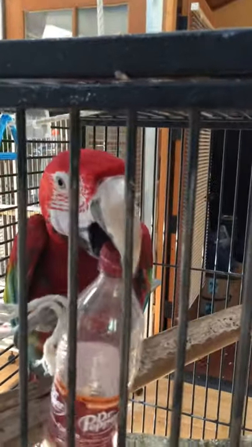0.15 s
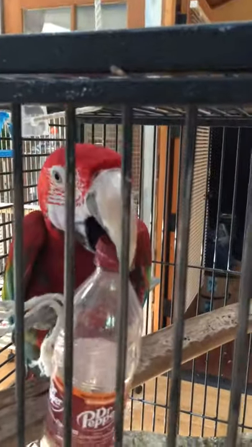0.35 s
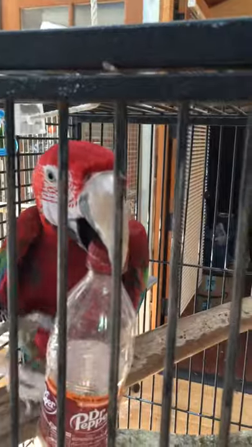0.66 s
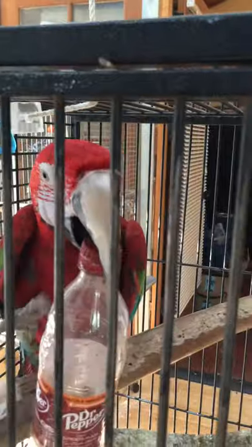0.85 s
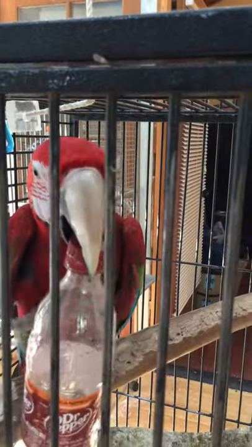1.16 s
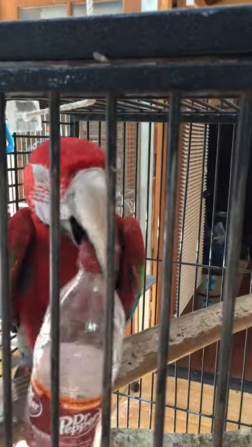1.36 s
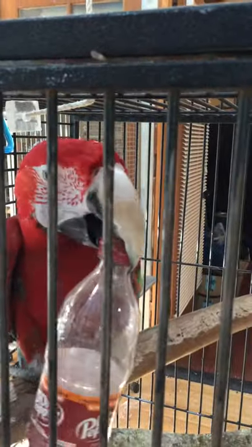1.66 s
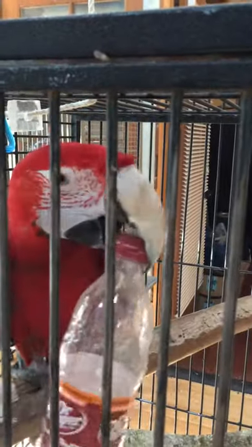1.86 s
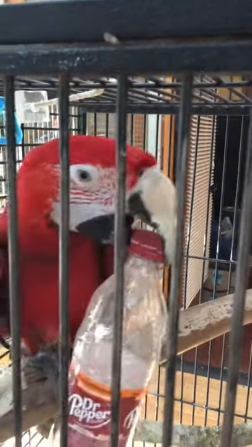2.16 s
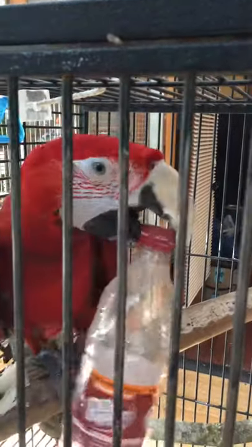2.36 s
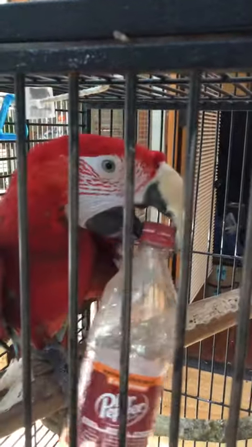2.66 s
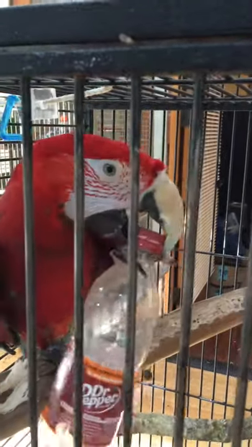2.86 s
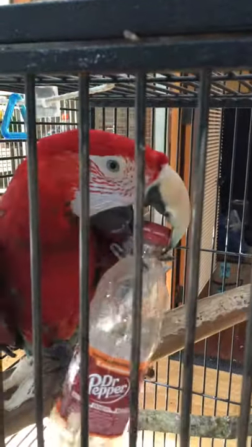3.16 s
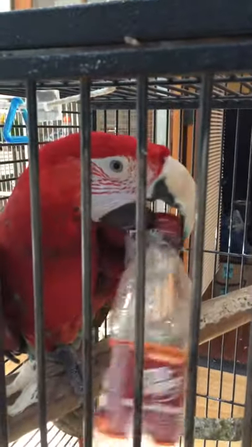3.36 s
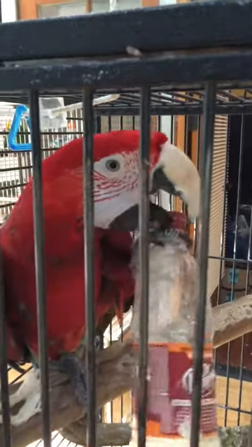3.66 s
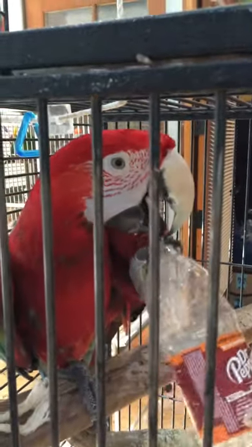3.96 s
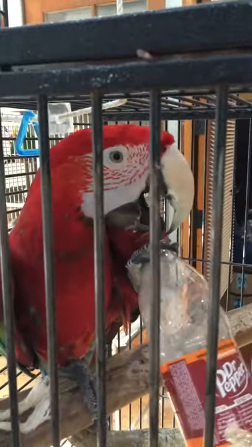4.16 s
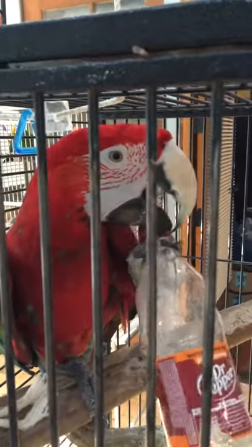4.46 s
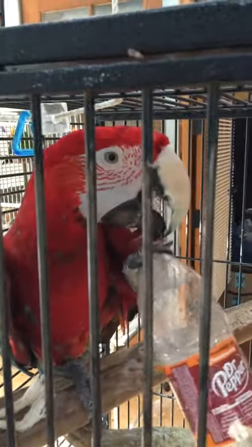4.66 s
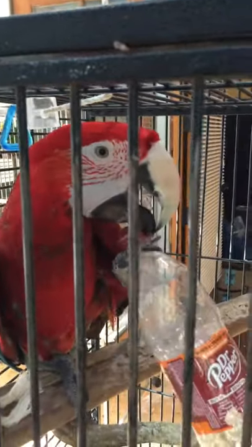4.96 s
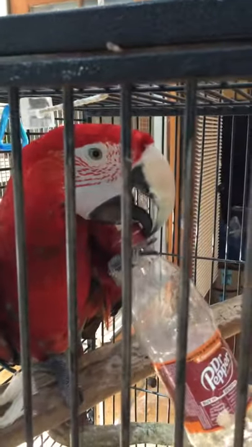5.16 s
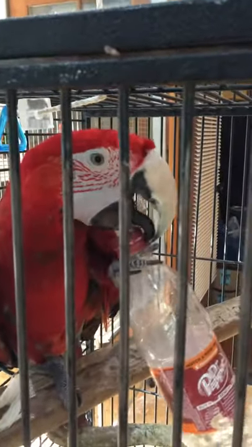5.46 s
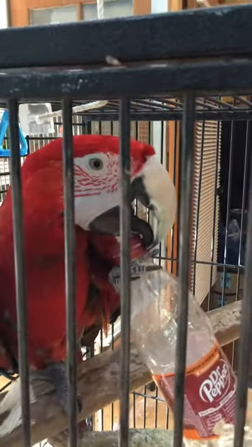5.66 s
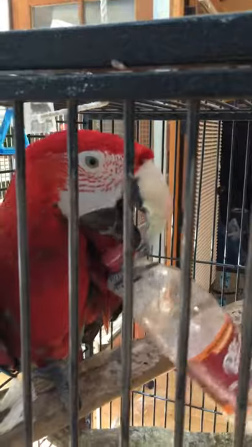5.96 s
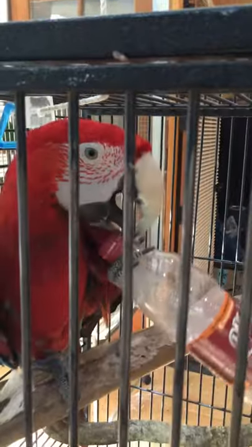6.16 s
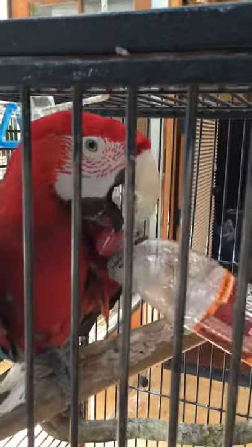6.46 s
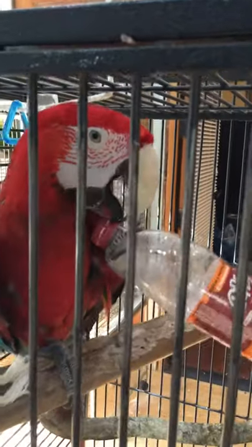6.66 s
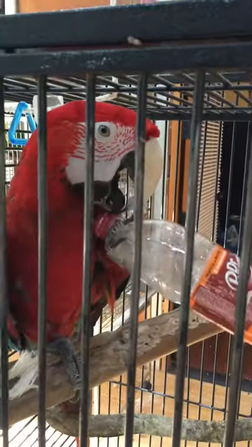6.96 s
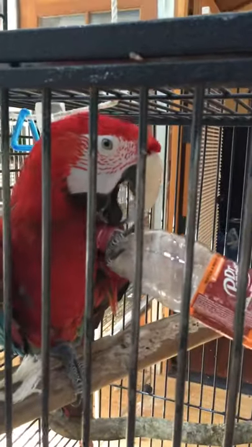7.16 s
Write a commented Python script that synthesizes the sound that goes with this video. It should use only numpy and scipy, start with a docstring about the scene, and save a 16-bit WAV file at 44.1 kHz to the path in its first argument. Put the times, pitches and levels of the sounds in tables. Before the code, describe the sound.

A caged parrot screams near the microphone, four rough, piercing blasts in an even run, each echoing off the room's hard walls. A brief cry leads in, and a squeak and a peep slip between the later screams. Then it goes much quieter: the beak pops, ticks and scrapes on a plastic bottle while the bird shuffles and brushes the wires. A short, raspy squawk comes last.

```python
"""Caged macaw screaming

A macaw screams up close in a hard, echoing room, its syrinx running two rough oscillators at once.
It opens with a cry, squeaks and peeps around the screams, and ends on a rattling squawk. In the lull
its beak pops and scrapes on a plastic bottle, and the cage wires ring faintly as it shuffles."""
import sys
import numpy as np
from scipy import signal
from scipy.fft import rfft, irfft, next_fast_len
from scipy.io import wavfile
from scipy.ndimage import uniform_filter1d, minimum_filter1d

SR = 44100
rng = np.random.default_rng(int(sys.argv[2]) if len(sys.argv) > 2 else 0)


def master_out(mix):
    """Clip the mix to full scale and print it as 16-bit PCM to the path in sys.argv[1]."""
    frames = np.transpose(np.atleast_2d(mix))
    ceiling = np.clip(frames, -1, 1)
    pcm = np.round(ceiling * 32767).astype(np.int16)
    wavfile.write(sys.argv[1], SR, pcm)


N = 322812

# the big screams: t/s, length/s, effort/dB, swell/s, sag/(dB/s), low f/Hz, high f/Hz, roughness/0-1
SCREAMS = [(0.496, 0.601, -10, 0.026, 5.5, 899, 1969, 0.65),
           (1.343, 0.562, -9, 0.036, 5, 894.7, 1955, 0.65),
           (2.204, 0.62, -9, 0.094, 5.5, 870.8, 1916, 0.66), (3.09, 0.58, -11, 0.02, 2, 835.8, 1869, 0.73)]
# partials of the two oscillators, sum and difference tones included: multiple of low, multiple of high
SCREAM_PARTIALS = [(1, 0), (-1, 1), (0, 1), (3, 0), (1, 1), (2, 1), (0, 2), (3, 1)]
# the balance of those partials: level/dB
SCREAM_PARTIAL_DB = [-5.5, -7.5, 0.86, -4, 4.6, -10, -17, -9]
# the oscillators lock and the scream clears: t/s, half length/s, roughness lost/0-1
LOCKS = [(2.264, 0.06, 0.6), (2.634, 0.045, 0.9)]
# the throat's EQ on the rasp: f/Hz, level/dB
THROAT = [(300, -61), (600, -37), (690, -19.5), (780, -22), (880, -12), (970, -19.5), (1070, -10.5),
          (1200, -15), (1480, -8), (1900, -2), (2080, -1.5), (2230, -2), (2720, -1), (3020, -7), (3450, -5),
          (4700, -11.5), (6800, -18.5), (7600, -25), (15500, -43.5)]


def scream(start, length, peak_db, swell_s, sag_db_per_s, low_top_hz, high_top_hz, roughness,
           windpipe_hz=897, windpipe_width_hz=42, rest_hz=865, lock_db=3.5, onset_s=0.024):
    """Two coupled membranes give sum and difference tones, and chop the air into a rasp."""
    t = np.arange(0, length, 1 / SR)
    release = np.maximum(1 - (length - t) / 0.043, 0)
    effort_db = peak_db - 14 * np.exp(-t / swell_s) - sag_db_per_s * t - 13 * release
    slack = 1 - np.abs(np.sin(np.pi * t / length)) ** 0.5  # a broad arch of tension: both ends go flat
    low_hz = low_top_hz * (1 - 0.05 * slack)
    high_hz = high_top_hz * (1 - 0.035 * slack)
    locked = sum(share * np.exp(-((start + t - s) / half) ** 2) for s, half, share in LOCKS)
    fray = 1 + 0.25 * (t / length - .5)
    rough = np.clip(roughness * fray * (1 - locked), 0, 1)
    low_bend = 1 - 0.02 * locked + 0.009 * rough * wander(t, hz=30)
    low = swing(t, low_hz * low_bend, jitter=.035 * rough, jitter_hz=202)
    high_bend = 1 + 0.022 * rough * wander(t, hz=30)
    high = swing(t, high_hz * high_bend, jitter=0.0416 * rough, jitter_hz=317)
    coupling_db = 0.6 * (effort_db - peak_db)  # sum and difference tones need full effort
    partials = []
    for (m, n), db in zip(SCREAM_PARTIALS, SCREAM_PARTIAL_DB):
        surge_db = 4.5 * rough * wander(t, hz=22)
        partials.append(gain_of(db + (m * n != 0) * coupling_db + surge_db) * np.cos(m * low + n * high))
    partials[0] /= np.hypot(1, (low_hz - windpipe_hz) / windpipe_width_hz)  # loudest on the resonance
    partials[2] *= gain_of(lock_db * locked)  # the high tone rings out while locked
    pulsing = (1 + 0.71 * np.cos(low)) * (1 + .3 * np.cos(low / 2))  # strong and weak puffs alternate
    puffs = pulsing * rng.standard_normal(len(t))
    throat = np.multiply(THROAT, [low_hz.mean() / rest_hz, 1])  # the throat tightens with the pitch
    rasp = patchy(coloured(puffs, throat), depth_db=2.0)
    voice = blend(sum(partials), rasp, rough) * gain_of(2.0 * wander(t, hz=90))
    return start, (1 - np.exp(-t / onset_s)) * opened(voice, effort_db, bite=.25, bite_hz=3500)


# contours of the four short calls: t/s, effort/dB, f/Hz, roughness/0-1
CRY = [(0, -3, 417.6, 0.77), (0.06, -18, 416, 0.46), (0.09, -14, 426.5, 0.43), (0.135, -14, 427.2, 0.42),
       (0.178, -18, 433.2, 0.3), (0.191, -11.5, 413, 0.5), (0.203, -25, 426, 0.8), (0.225, -54.5, 404, .6)]
SQUEAK = [(1.97, -42, 980, 0.5), (2.0, -24.5, 1028, 0.26), (2.07, -26, 1091, 0.18),
          (2.098, -18, 1037, 0.01), (2.122, -20.5, 1051, 0.05), (2.143, -11.5, 1021, 0.03),
          (2.16, -17, 1002, 0.14), (2.178, -42.5, 1020, 0.3)]
PEEP = [(2.925, -40.5, 2470, 0.05), (2.95, -26.5, 2441, 0.2), (3.0, -38.5, 2374, 0.2)]
SQUAWK = [(6.997, -68, 1433, .8), (7.003, -39, 1410, 0.43), (7.05, -22.5, 1510, 0.44),
          (7.08, -21, 1544, 0.86), (7.105, -16, 1921, 0.33), (7.17, -19, 1979, 0.29),
          (7.2, -19.5, 2032, 0.77), (7.23, -29, 1906, 0.6), (7.26, -53, 1768, 0.65)]
# their harmonics, from the fundamental up: level/dB
CRY_HARMONICS = [-25.5, -10.5, -10.5, 0.5, -4, -13.5, -10, -7.5, -8.5, -13, -17.5, -16]
SQUEAK_HARMONICS = [-43.5, -6, -12.5, 2.5, -13.5, -4, -11, -10, -15, -16, -22.5, -27.5, -22.5, -22]
PEEP_HARMONICS = [4, -31.5, -18, -30.5, -25]
SQUAWK_HARMONICS = [-4, 5, -11.5, -10, -29, -31]
# the throat's EQ on the cry's rasp: f/Hz, level/dB
CRY_THROAT = [(180, -87.5), (300, -39), (411, -31), (674, -33.5), (835, -10), (937, -20.5), (1440, -12),
              (1700, -7), (1810, -10), (3870, -13.5), (7500, -30), (9800, -42), (15500, -48)]
# formants of the tight throat: f/Hz, width/Hz, level/dB
SQUEAK_FORMANTS = [(2130, 220, -5.5), (3100, 300, -21.5), (4080, 400, 0.5), (6090, 300, -14),
                   (8040, 430, -16.5), (9900, 860, -12.5), (14060, 1200, -23)]
SQUAWK_FORMANTS = [(1000, 130, -21.5), (1710, 220, -10), (2190, 260, -1), (3100, 290, -2.5),
                   (4030, 650, -4.5), (5260, 420, -4), (7170, 510, -7), (8560, 330, -14),
                   (10100, 1000, -16), (14400, 1500, -25)]


def call(contour, harmonics_db, throat, jitter, bite, rattle=0, rattle_hz=124.8):
    """One membrane sings a harmonic stack over a rasp; at high effort a beat can make both rattle."""
    t = np.arange(contour[0][0], contour[-1][0], 1 / SR)
    times, *columns = np.transpose(contour)
    effort_db, hz, rough = (np.interp(t, times, column) for column in columns)
    phase = swing(t, hz, jitter * np.sqrt(rough), jitter_hz=245)
    tone = sum(gain_of(db) * np.cos(k * phase) for k, db in enumerate(harmonics_db, 1))
    puffs = (1 + 0.35 * np.cos(phase)) * rng.standard_normal(len(t))
    beat = np.cos(swing(t, rattle_hz, jitter=0.038, jitter_hz=60))
    chop = 1 + rattle * gain_of(effort_db - effort_db.max()) * beat
    rasp = patchy(coloured(puffs, throat), depth_db=4.0)
    return t[0], opened(chop * blend(tone, rasp, rough), effort_db, bite, bite_hz=3000)


def swing(t, hz, jitter, jitter_hz):
    """Phase of a membrane whose rate is unsteady."""
    return 2 * np.pi * np.cumsum(hz * (1 + jitter * wander(t, jitter_hz))) / SR


def patchy(x, depth_db):
    """Narrow bands of the rasp swell and sink, each for a few hundredths of a second."""
    bands = signal.stft(x, nperseg=1024, noverlap=768)[2]
    patches = uniform_filter1d(rng.standard_normal(bands.shape), 7, axis=0)
    patches = evened(uniform_filter1d(patches, 8, axis=1))
    mottled = signal.istft(bands * gain_of(depth_db * patches), nperseg=1024, noverlap=768)[1]
    return evened(mottled[:len(x)])


def blend(tone, rasp, rough):
    """Equal-power crossfade from tone to rasp, with soft ends."""
    voice = np.sqrt(1 - rough) * evened(tone) + np.sqrt(rough) * rasp
    return voice * signal.windows.tukey(len(tone), .02)


def opened(voice, effort_db, bite, bite_hz):
    """Effort rides the level, and the treble only opens fully at the peak."""
    dull = signal.sosfilt(signal.butter(1, bite_hz, fs=SR, output="sos"), voice)
    treble = (voice - dull) * gain_of(bite * (effort_db - effort_db.max()))
    return gain_of(effort_db) * evened(dull + treble)


# beak pops: t/s, level/dB, f/Hz
POPS = [(4.0657, -20, 1196), (4.165, -41, 1180), (4.237, -48, 1157), (4.562, -18.5, 1170),
        (4.845, -45.5, 1160), (4.909, -45, 1142), (4.966, -48.5, 1130), (5.045, -39, 1155),
        (5.155, -37.5, 1140), (5.885, -47, 646), (6.131, -34, 1226), (6.358, -28, 1032), (7.13, -41, 1150),
        (7.287, -42, 1293)]
# the plastic bottle's colour, for pop ticks and scrapes: f/Hz, level/dB
BOTTLE = [(240, -42), (400, -11), (519, -5), (784, -1), (1150, -4), (1400, 1.5), (5910, -1), (11800, -12),
          (15500, -18.5)]


def beak_pop(s, db, hz, rise_s=0.00024, decay_s=0.0023, glide_s=0.00064):
    """The beak snaps off the bottle: a small cavity rings briefly, rising in pitch as it opens."""
    t = np.arange(2048) / SR
    phase = 2 * np.pi * np.cumsum(hz * (1 - 0.33 * np.exp(-t / glide_s))) / SR
    tick = gain_of(-27) * coloured(rng.standard_normal(len(t)), BOTTLE, tilt_db=-2.5)
    envelope = np.exp(-t / decay_s) * (1 - np.exp(-t / rise_s))
    return s, gain_of(db + 3.0) * (np.sin(phase) + tick) * envelope


# strokes on the bottle and the cage: t/s, level/dB, rise/s, hold/s, decay/s, tilt/(dB/octave)
BOTTLE_SCRAPES = [(4.269, -54.5, 0.017, 0.13, 0.076, -3.5), (5.038, -50, 0.0032, 0.0093, 0.072, 4),
                  (5.213, -53.5, 0.013, 0.024, 0.17, 0.5), (5.51, -44, 0.0057, 0.041, 0.035, 6.5),
                  (6.288, -58, .015, 0.036, 0.048, 3), (6.449, -45, 0.016, 0.032, .035, 2),
                  (6.76, -62, 0.02, .06, 0.04, 3)]
WIRE_RUBS = [(4.311, -47, 0.028, 0.032, 0.088, 2.5), (4.712, -59.5, 0.008, 0.043, 0.042, 1)]
BAR_KNOCKS = [(5.975, -53, .001, 0.047, 0.075, -2)]
# the ring of a thin cage wire and of a thick bar: f/Hz, width/Hz, level/dB
WIRE_MODES = [(2765, 120, 4.5), (4210, 230, -3), (5960, 390, -3.5), (7670, 410, -4), (9830, 560, -8),
              (12000, 530, -10), (14570, 1170, -12)]
BAR_MODES = [(2215, 130, 10), (2950, 79, 3), (4370, 130, -14), (6400, 150, -17)]


def scrape(body, s, db, rise, hold, decay, tilt_db):
    """A quick slip: fine grains coloured by the body that is rubbed, dying away."""
    t = np.arange(SR // 2) / SR
    stroke = np.minimum(t / rise, 1) * np.exp(-np.maximum(t - rise - hold, 0) / decay)
    grains = rng.standard_normal(len(t)) * gain_of(2 * wander(t, hz=400))
    return s, gain_of(db) * stroke * coloured(grains, body, tilt_db)


# the hard room's reverb time: f/Hz, T60/s
ROOM_DECAY = [(300, 0.9), (1300, 0.74), (3500, 0.73), (9000, 0.59), (15000, 0.14)]


def room(x, wet_db, early_db, early_s=0.045):
    """Direct sound plus sparse reflections: a lift on the early ones, a tail that dies band by band."""
    taps = np.zeros(SR)
    slots = np.arange(200, SR - 20, 20)
    taps[slots + rng.integers(0, 20, len(slots))] = rng.choice([-1., 1.], len(slots))
    hz, t, bands = signal.stft(taps, SR, nperseg=256)
    decay = gain_of(-60 * t / curve_at(ROOM_DECAY, hz)[:, None])
    early_lift = 1 + gain_of(early_db) * np.exp(-t / early_s)
    tail = signal.istft(bands * decay * early_lift, SR, nperseg=256)[1]
    return x + gain_of(wet_db) * signal.fftconvolve(x, tail / np.linalg.norm(tail))[:N]


# dull shuffles and bumps: t/s, level/dB, rise/s, decay/s, tilt/(dB/octave)
SHUFFLES = [(0.41, -53, 0.11, 0.093, -3), (1.8, -53.5, 0.04, 0.5, 9.5), (3.13, -63, 0.04, 0.18, 2),
            (3.83, -62, 0.04, 0.75, -3), (4.15, -50, 0.05, 0.43, -3), (5.22, -49.5, 0.06, 0.27, -1),
            (5.955, -44, 0.027, 0.079, 0), (6.3, -57.5, 0.06, 0.2, -2.5), (6.48, -54, 0.019, 0.05, 0),
            (6.61, -53.5, 0.03, 0.2, -3)]
# the low murk of the shuffles and the room's rumble: f/Hz, level/dB
RUMBLE_COLOUR = [(15, -42.5), (25, -17.5), (65, -3.5), (140, 1), (205, -1.5), (248, -6.5), (404, -16),
                 (500, -16), (650, -46.5), (1100, -120)]


def shuffle(s, db, rise, decay, tilt_db):
    """The bird shifts about: a low, dull rush that swells and dies away."""
    t = np.arange(3 * SR) / SR
    swell = np.minimum(t / rise, 1) * np.exp(-np.maximum(t - rise, 0) / decay)
    return s, gain_of(db) * swell * coloured(rng.standard_normal(len(t)), RUMBLE_COLOUR, tilt_db)


# room tone: f/Hz, level/dB
AIR_COLOUR = [(120, -31.5), (200, -2), (385, -9), (1130, -8.5), (1590, -13.5), (2850, -13.5), (3550, -17.5),
              (6350, -22.5), (15500, -30)]


def background():
    """Still room air, and shuffles over a faint, unsteady rumble."""
    rumble = gain_of(-68) * coloured(rng.standard_normal(N), RUMBLE_COLOUR)
    for row in SHUFFLES:
        add(rumble, *shuffle(*row))
    rumble *= gain_of(1.8 * wander(np.arange(N) / SR, hz=8))
    return rumble + gain_of(-61) * coloured(rng.standard_normal(N), AIR_COLOUR)


def gain_of(db):
    return 10 ** (np.asarray(db) / 20)


def evened(x):
    """Scales to rms 1."""
    return x / np.sqrt(np.mean(x ** 2) + 1e-20)


def wander(t, hz):
    """Random drift of rms 1, rolled off above hz."""
    lowpass = signal.butter(2, hz, fs=SR, output="sos")
    return evened(signal.sosfilt(lowpass, rng.standard_normal(len(t) + 4096))[4096:])


def curve_at(points, hz):
    """A curve's value on a log-frequency axis."""
    f, value = np.transpose(points)
    return np.interp(np.log(hz + 1), np.log(f + 1), value)


def coloured(x, spectrum, tilt_db=0):
    """Applies an EQ curve, tilted by tilt_db per octave; rms 1."""
    size = next_fast_len(len(x) + 2048)
    hz = np.fft.rfftfreq(size, 1 / SR)
    eq = gain_of(curve_at(spectrum, hz) + tilt_db * np.log2(hz + 1))
    return evened(irfft(rfft(x, size) * eq, size)[:len(x)])


def ringing(modes, low_cut_hz=1300):
    """The EQ curve of a small body's resonances; it radiates little bass."""
    hz = np.arange(20, SR / 2, 20)
    power = sum(gain_of(2 * db) / (1 + ((hz - f) / width) ** 2) ** 2 for f, width, db in modes)
    return np.transpose([hz, 10 * np.log10(power / (1 + (low_cut_hz / hz) ** 6))])


def add(mix, s, sound):
    """Lays a sound into the mix at s seconds."""
    part = mix[max(round(s * SR), 0):][:len(sound)]
    part += sound[:len(part)]


def scene():
    """The bird's voice fills the room; its beak works close by."""
    voice, beak, rubbing = np.zeros((3, N))
    for row in SCREAMS:
        add(voice, *scream(*row))
    add(voice, *call(CRY, CRY_HARMONICS, CRY_THROAT, jitter=0.018, bite=.1))
    add(voice, *call(SQUEAK, SQUEAK_HARMONICS, ringing(SQUEAK_FORMANTS), jitter=0.035, bite=0.044))
    add(voice, *call(PEEP, PEEP_HARMONICS, THROAT, jitter=0.056, bite=.03))
    add(voice, *call(SQUAWK, SQUAWK_HARMONICS, ringing(SQUAWK_FORMANTS),
                     jitter=0.0704, bite=0.86, rattle=0.34))
    for row in POPS:
        add(beak, *beak_pop(*row))
    low_cut = signal.butter(2, 300, "high", fs=SR, output="sos")  # a small cavity radiates no bass
    beak = signal.sosfilt(low_cut, beak)
    for body, strokes in ((BOTTLE, BOTTLE_SCRAPES), (ringing(WIRE_MODES), WIRE_RUBS),
                          (ringing(BAR_MODES), BAR_KNOCKS)):
        for row in strokes:
            add(rubbing, *scrape(body, *row))
    mix = gain_of(-3.5) * room(voice, wet_db=-0.5, early_db=0.5)
    mix += room(beak, wet_db=-13.0, early_db=5)
    mix += room(rubbing, wet_db=-4.5, early_db=-21)
    return (mix + background())[None]


def record(dry):
    """A fast limiter holds the loudest peaks at full scale; a steep high cut follows."""
    allowed = 1 / np.maximum(np.abs(dry), 1)
    limited = dry * uniform_filter1d(minimum_filter1d(allowed, size=129), size=129)
    high_cut = signal.firwin(511, 15700, window=("kaiser", 9), fs=SR)
    return signal.oaconvolve(limited, high_cut[None], "same")


dry = scene()
out = record(dry)
master_out(out)
```